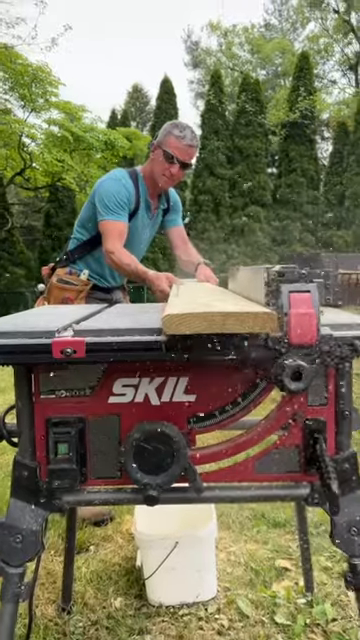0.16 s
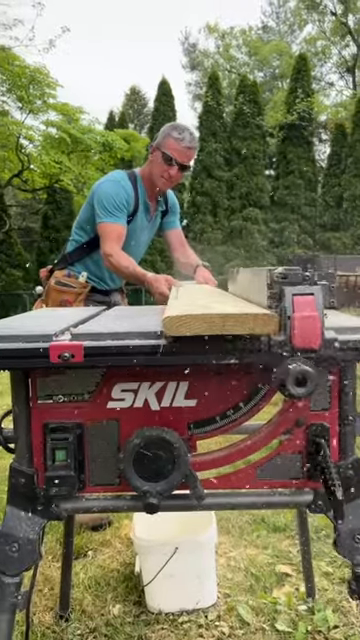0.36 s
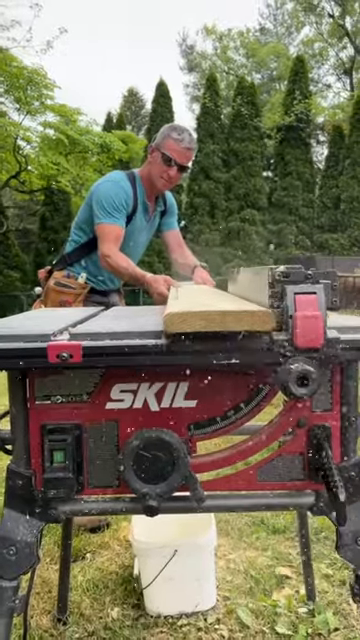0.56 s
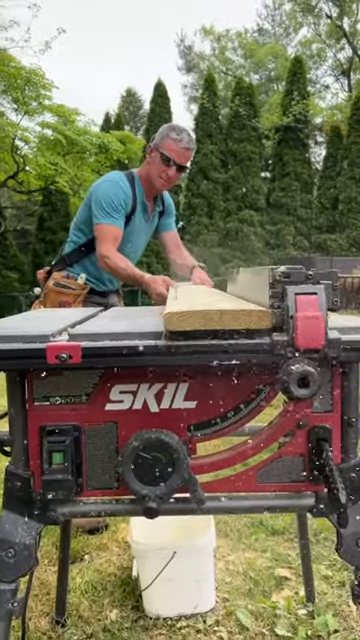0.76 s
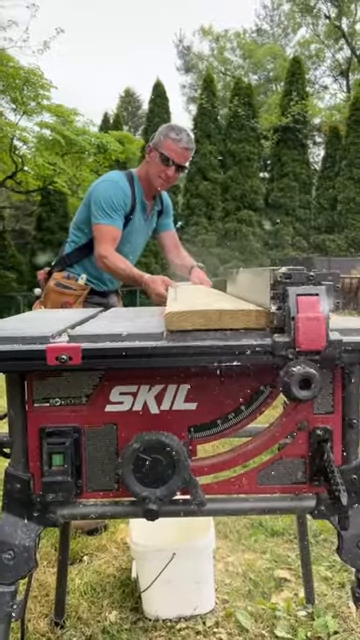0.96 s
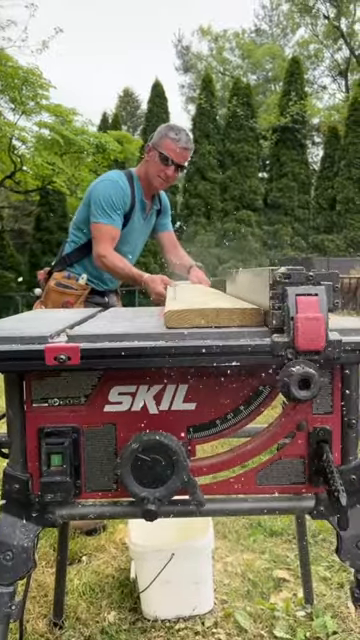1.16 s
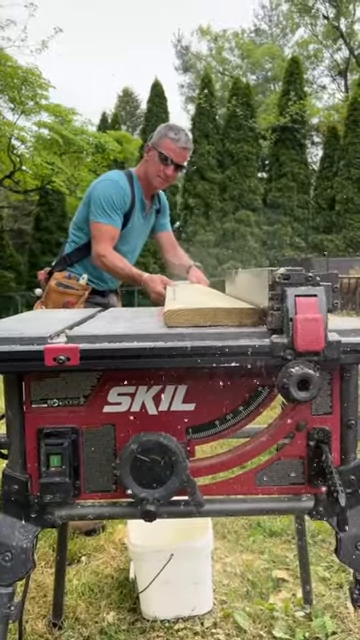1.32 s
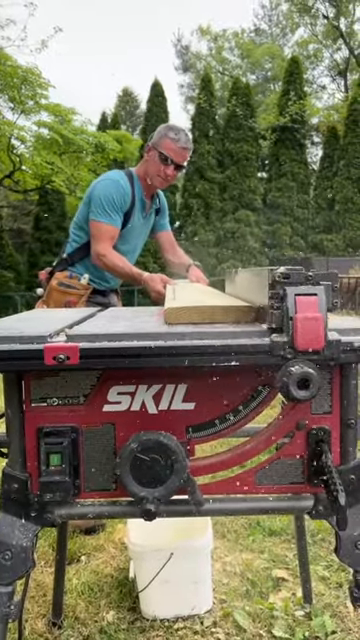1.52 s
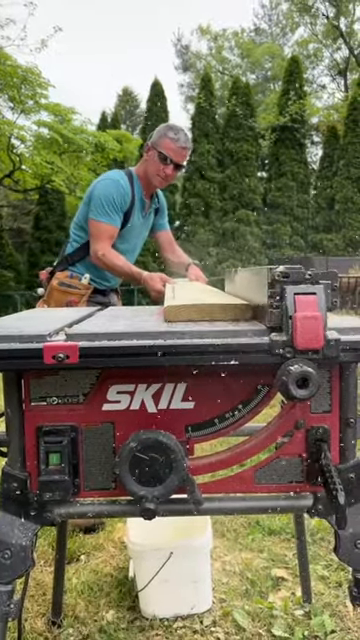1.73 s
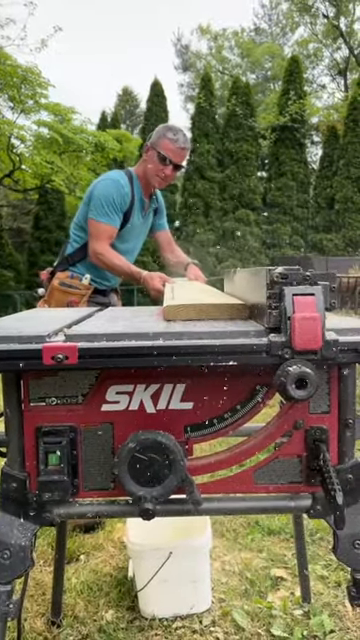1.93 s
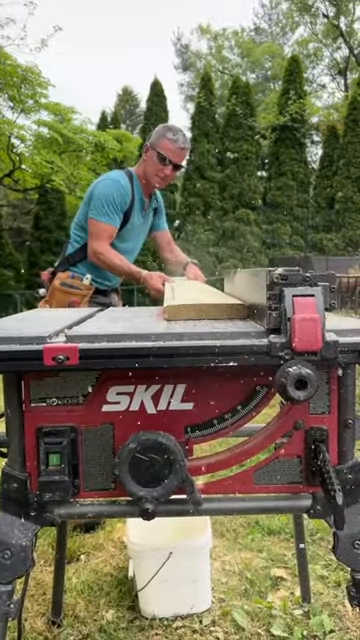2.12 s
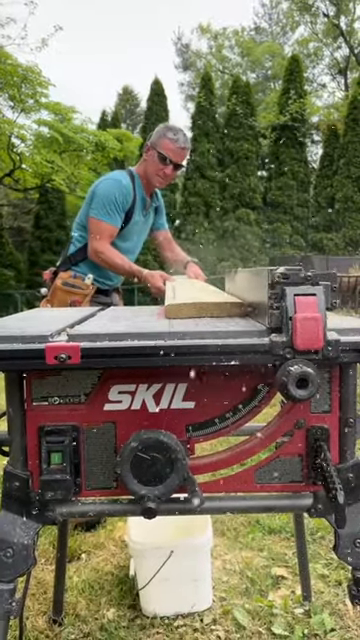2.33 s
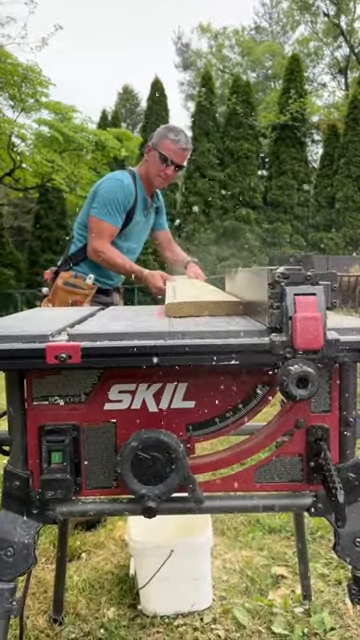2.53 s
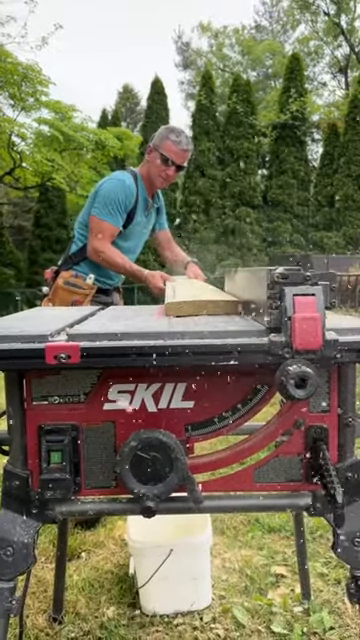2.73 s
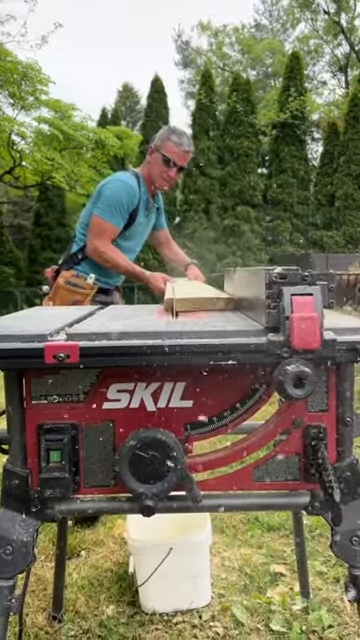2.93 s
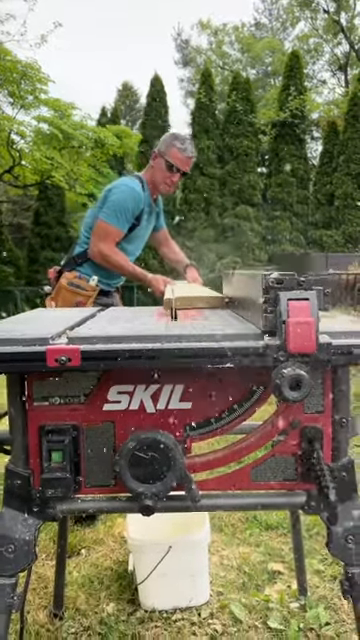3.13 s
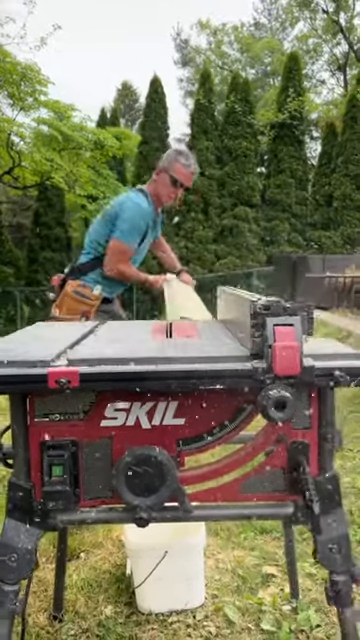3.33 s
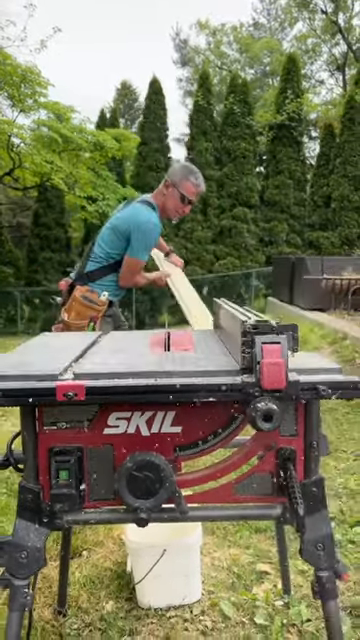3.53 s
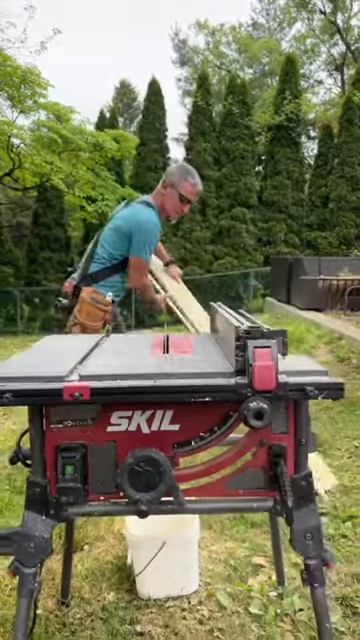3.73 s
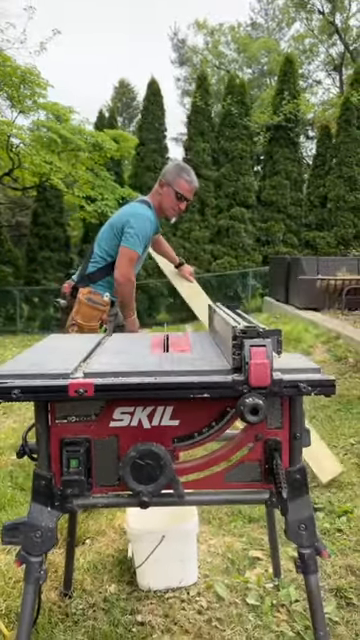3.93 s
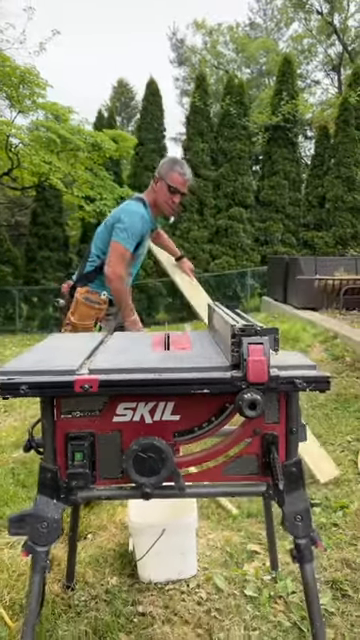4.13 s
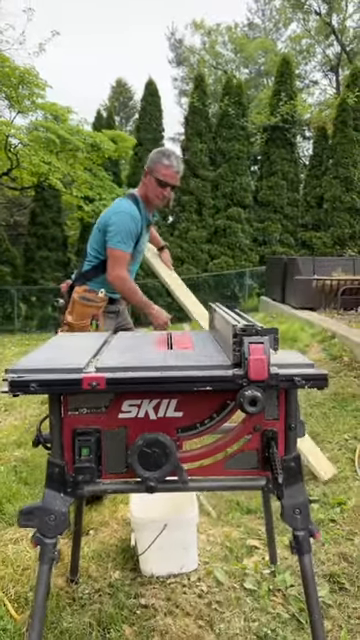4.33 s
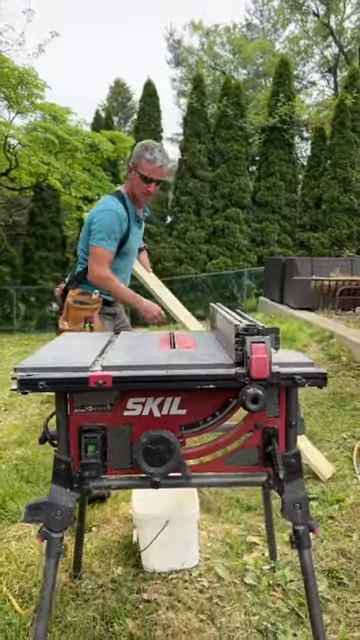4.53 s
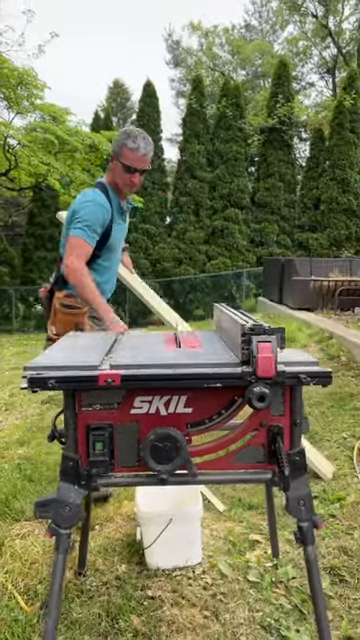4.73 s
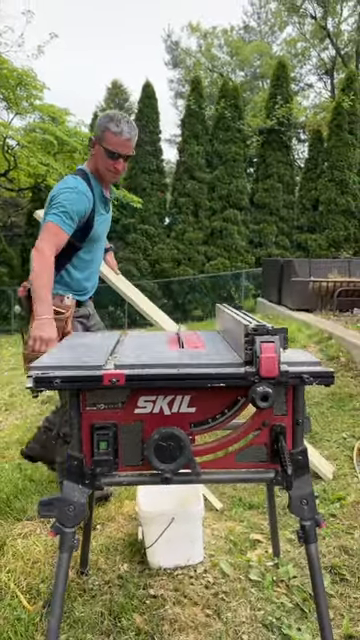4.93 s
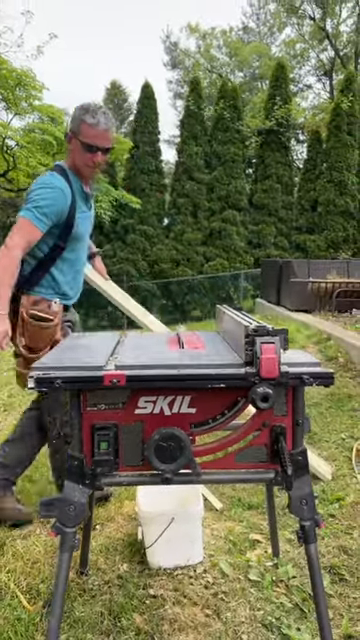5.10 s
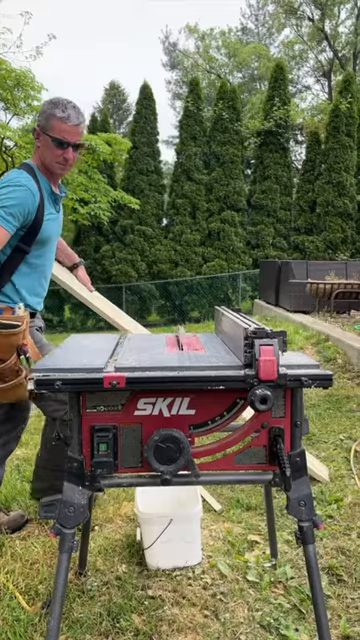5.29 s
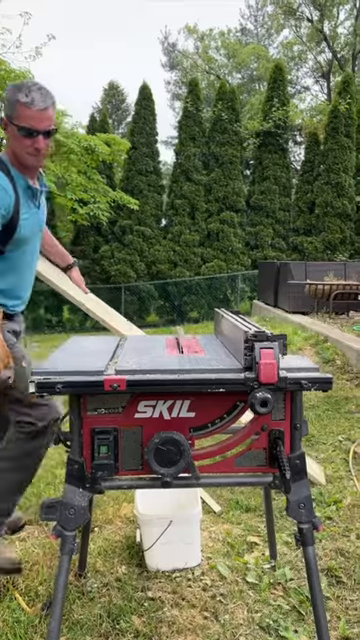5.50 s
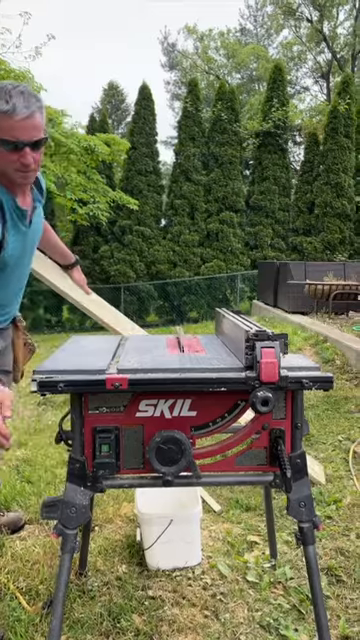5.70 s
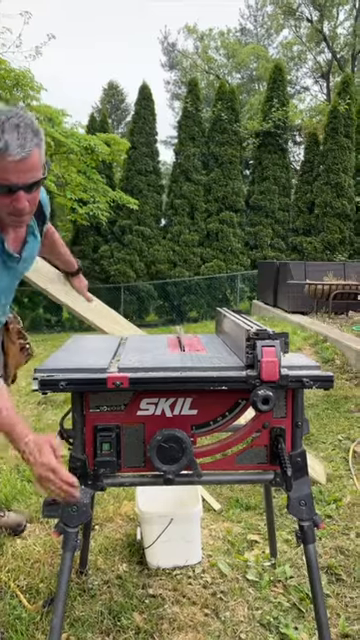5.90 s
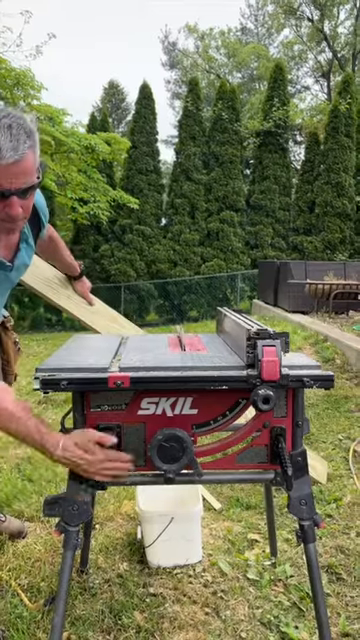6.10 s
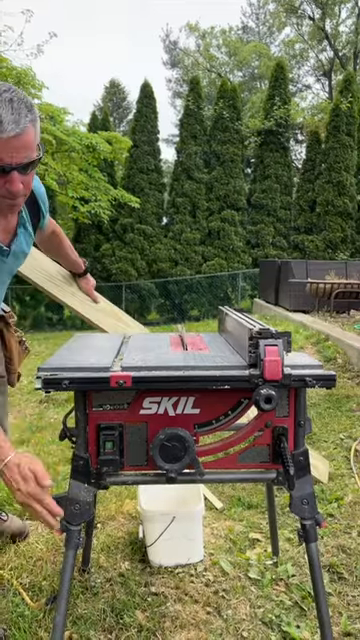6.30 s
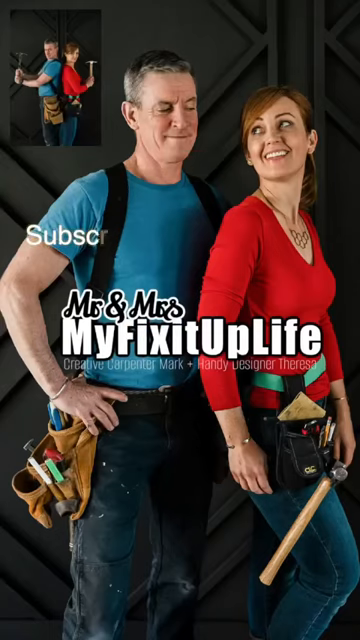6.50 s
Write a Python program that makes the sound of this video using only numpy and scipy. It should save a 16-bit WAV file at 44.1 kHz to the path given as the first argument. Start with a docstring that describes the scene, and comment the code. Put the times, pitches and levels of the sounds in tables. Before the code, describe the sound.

Outdoors and close, in wide stereo, a portable table saw is already ripping a plank at 0 s. Dense, bright, gritty chewing mixes with a hard tooth whine, ringing blade tones, woody rattle and the motor's low buzzing hum. The whine sags slightly until about 0.3 s, wavers, then climbs gradually from 1.5 s as the load eases, its overtones swelling in and out. A low tremor shakes the stand around 2.5 to 2.75 s. The chewing dips near 2.85 s, then one last harsh bite squeals at about 3.05 s and stops, leaving metal ringing briefly. From 3.1 s the freed blade spins up, settling into a smooth, airy roar with hiss and whirring motor tones. A faint, dull thud lands near 3.75 s. At about 6.05 s the saw is switched off; pitch and hiss fall quickly, and everything cuts off abruptly near 6.35 s.

```python
"""On a lawn, a portable table saw rips a plank. The teeth whine as tones locked to the blade speed; torn
fibres are dense noisy clicks that chew, ring the blade modes and rattle the plank. The loaded motor hums at
fixed pitches, roars and hisses as shaped noise, and its armature tones follow the speed. The blade bites once
more, spins up freely, is switched off, and the sound is cut short. The sound is wide in stereo, its width and
side changing with pitch."""
import sys
import numpy as np
from scipy import signal
from scipy.io import wavfile
from scipy.ndimage import uniform_filter1d

SR = 44100
rng = np.random.default_rng(int(sys.argv[2]) if len(sys.argv) > 2 else 0)


def int16_out(signal):
    """Quantize to a 16-bit WAV file."""
    q = np.round(np.clip(np.atleast_2d(signal).T, -1, 1) * 32767)
    wavfile.write(sys.argv[1], SR, q.astype(np.int16))


N = 288855

# Blade speed under load. Each row: time in seconds, blade turns per second.
LOADED_SPEED = [(0.0, 57.6), (0.15, 57.35), (0.33, 56.83), (0.5, 57.12), (0.8, 58.35), (1.03, 58.63),
                (1.2, 58.37), (1.42, 57.66), (1.6, 58.05), (1.8, 58.87), (1.97, 59.85), (2.28, 60.6),
                (2.4, 61.2), (2.55, 61.9), (2.7, 62.98), (2.85, 63.5), (3.0, 62.0), (3.12, 58.5)]
FREE_TURNS_PER_S, SPIN_UP_S = 71.0, .63   # freed, the blade closes in on its idle speed
OFF_S, RUN_DOWN_PER_S2 = 6.035, 68        # switched off, it loses this many turns per second each second
TOOTH_COUNT, GEAR = 24, 5.385             # GEAR is motor turns per blade turn

# Tooth whine as multiples of the tooth rate; alternating left and right ground teeth add half lines.
# Each entry: multiple.
WHINE_MULTIPLES = [1, 2, 3, 4, 5, 4.5, 5.5]
# Bed of each whine line between swells. Each entry: middle level in dB.
WHINE_BED_DB = [-48.5, -50, -54, -44.5, -47.5, -50, -54]
# Swells of the whine. Each row: start in seconds, end in seconds, tooth multiple, level in dB.
WHINE_SWELLS = [(0.1, 0.42, 1, -38), (0.48, 0.68, 1, -41), (1.75, 2.0, 1, -47), (2.04, 2.58, 1, -40.5),
                (0.36, 0.5, 2, -43), (0.7, 0.9, 2, -42), (1.22, 1.4, 2, -39), (1.5, 1.72, 2, -40.5),
                (1.92, 2.33, 2, -37), (1.66, 1.86, 3, -42), (1.9, 2.06, 3, -35), (0.0, 0.1, 4, -36),
                (0.18, 0.33, 4, -32), (0.44, 0.6, 4, -40), (0.68, 0.95, 4, -32.5), (1.0, 1.4, 4, -28),
                (1.46, 1.68, 4, -35.5), (2.04, 2.2, 4, -35), (2.66, 2.78, 4, -41), (2.04, 2.19, 5, -38),
                (0.68, 1.42, 4.5, -40), (1.86, 1.98, 4.5, -40), (1.55, 1.75, 5.5, -46),
                (2.0, 2.3, 5.5, -42)]
WHINE_END_S, SWELL_EDGE_DB_PER_S = 2.85, 223.5
# Thin tone under the fourth tooth multiple at the start. Each row: time in seconds, level in dB.
STRAY = [(0, -38), (.28, -43), (.4, -62)]
STRAY_PER_TURN = 90   # cycles per blade turn

# Strength of the cut, before trims. Each row: time in seconds, chewing in dB, plank rattle in dB.
CUT = [(0.0, -32, -36.5), (0.35, -32.5, -37), (0.6, -33.5, -38.5), (1.45, -33.5, -38), (1.9, -35, -35.5),
       (2.14, -35, -35.5), (2.3, -34, -40), (2.45, -34.5, -37), (2.78, -31.5, -41.5), (2.84, -39, -47),
       (2.96, -37.5, -49), (3.04, -28.5, -40.5), (3.09, -32.5, -58), (3.13, -45.5, -66.5), (3.2, -54, -63)]
# Colour of the chewing. Each row: frequency in Hz, relative level in dB per Hz.
CHEW_COLOUR = [(35, -45.5), (60, -14.5), (150, -17), (190, -6), (240, -9), (300, -10), (600, -4.5),
               (850, -1), (1100, -3), (1300, -9), (2150, -13), (2500, -10), (3300, -8), (4100, -11),
               (5000, -2.5), (6000, -1), (7000, -4.5), (8500, -6.5), (10000, -8), (10600, -9), (11150, -13),
               (12000, -14), (16000, -17)]
# Blade modes rung by the cut. Each entry: pitch in Hz.
BLADE_HZ = [1700, 1990, 2245, 3170, 3790, 4600, 4780, 5050, 5255, 5450, 5810, 6030, 6150, 6326, 6630, 7040,
            7235, 7535, 7850, 8075, 8700, 9300, 9580, 9780, 10228, 10370, 10930, 11295]
# Weight of each of those modes before it follows the chewing. Each entry: level in dB.
BLADE_DB = [-51.5, -51, -44.5, -54, -55.5, -47, -51, -49, -43, -44, -46, -43, -44, -49, -50, -49, -50, -51,
            -54, -50, -52, -48.5, -50, -52, -49, -50, -52, -50]
# Plank resonances. Each row: pitch in Hz, width of one filter pass in Hz, relative level in dB.
PLANK = [(382.5, 96, 0.5), (403.2, 58, 3), (435, 55, -1.5), (469.7, 50, -6), (816, 170, 0.5),
         (930, 240, -0.5)]
# The plank rubs the blade side. Each row: time in seconds, pitch in Hz, level in dB.
SQUEAL = [(2.9, 5150, -50.5), (3.02, 5270, -32), (3.045, 5100, -29), (3.085, 5300, -31), (3.12, 5330, -73)]

# The clearest blade modes. Each row: pitch in Hz before the rise, blur in Hz, roughness as a ratio.
SINGING_MODES = [(2632, 45, 1.5), (3381, 28, .6), (10228, 30, .8), (6150, 35, .8)]
# Bed of each clear mode between swells. Each entry: middle level in dB.
SINGING_BED_DB = [-43.5, -42, -56, -52]
# Swells of the clear modes. Each row: start in seconds, end in seconds, mode number 1 to 4, level in dB.
SINGING_SWELLS = [(0.034, 0.455, 1, -36.5), (0.6, 0.85, 1, -38.5), (1.2, 1.4, 1, -36.5),
                  (1.5, 1.783, 1, -38), (2.15, 2.326, 1, -39), (2.5, 2.747, 1, -40.5),
                  (0.473, 0.564, 2, -34), (0.6, 1.3, 2, -40.5), (1.38, 1.837, 2, -34.5),
                  (2.1, 2.27, 2, -39.5), (2.38, 2.434, 2, -38.5), (2.6, 2.76, 2, -41),
                  (3.044, 3.123, 2, -39), (0.28, 0.4, 3, -44), (2.2, 2.55, 3, -43), (0.08, 0.6, 4, -37)]
SINGING_END_S = 3.15
FREED_S, FREED_RISE = 2.8, .011   # with the plank no longer pressing, the clear modes rise by this ratio
# More modes sing on after the last bite. Each row: pitch in Hz, relative level in dB.
RING_OUT_MODES = [(2350, -39), (3060, -43), (3740, -45), (4230, -48), (4400, -51), (4690, -48), (4880, -51)]
# Their shared decay. Each row: time in seconds, gain in dB.
RING_OUT = [(3.02, -30), (3.07, -1), (3.14, -5), (3.4, -17), (3.6, -32)]

# Motor fan and brushes, before trims. Each row: time in seconds, roar in dB, hiss in dB, gain of the
# armature and casing tones in dB.
MOTOR = [(0, -36, -47, -8), (2.8, -36, -52, -6), (3.25, -32.5, -50.5, -6), (3.44, -33, -48.5, -5.5),
         (3.8, -34, -47.5, -2), (4.18, -34.5, -47, 2), (4.6, -34, -46.5, 1), (4.91, -34, -44, 2.5),
         (6.09, -33, -43, 2), (6.17, -36, -48.5, -6), (6.33, -41.5, -53.5, -3)]
# Colour of the fan roar. Each row: frequency in Hz, relative level in dB per Hz.
ROAR_COLOUR = [(40, -38), (100, -21), (160, -19), (270, -14.5), (310, -12), (380, -4.5), (620, -7),
               (780, 0.5), (950, -2), (1280, -5.5), (1500, -1), (2000, -4), (2400, -2), (2800, -4),
               (4000, -12), (4500, -14), (6000, -24), (16000, -34.5)]
# Colour of the brush hiss. Each row: frequency in Hz, relative level in dB per Hz.
HISS_COLOUR = [(1500, -27.5), (4000, 1.5), (6000, -2), (9000, -6), (13500, -8.5), (14500, -20.5),
               (16000, -9.5)]
# Armature tones. Each row: multiple of motor turns, relative level in dB.
ARMATURE = [(.5, -61), (1, -58), (2, -44), (3, -43), (4, -44), (5, -48), (5.5, -49), (7, -48), (8, -49),
            (10, -54)]
# How freely the housing lets armature tones out as they climb. Each row: frequency in Hz, gain in dB.
VENTS = [(600, 0), (690, 6), (765, -1), (1040, -6), (1090, 0), (1150, 0), (1400, -6), (1455, 4), (1500, 3),
         (1525, -6), (1700, 0)]
COASTING_LOSS_DB = .8   # fade of armature and casing tones per turn a second lost after switch-off
# Air in the housing. Each row: pitch in Hz, width of one filter pass in Hz, relative level in dB.
CASING = [(514, 230, -48.5), (872, 195, -45), (1950, 330, -48.5)]
# Blade unbalance, before its speed gain. Each row: multiple of blade turns, level in dB.
WOBBLE = [(1, -55), (3, -60)]
# Load on the motor as a gain on its magnetic hum. Each row: time in seconds, gain in dB.
HUM_LOAD = [(0.0, -1.5), (0.4, 0), (1.9, -2), (2.3, -3.5), (2.44, -7), (2.5, -9), (2.92, -11), (3.28, -18),
            (3.36, -19), (3.9, -22), (4.5, -22), (6.03, -26.5), (6.06, -60)]
# Twice the mains rate and its multiples. Each row: pitch in Hz, roughness as a ratio.
HUM_LINES = [(119.8, .06), (239.6, .3), (359.5, .2)]
# Weight of each hum line before the load gain. Each entry: level in dB.
HUM_DB = [-43, -60, -33.5]
# The second hum line swells once. Each row: time in seconds, level in dB.
HUM_BUZZ = [(2.12, -66.5), (2.2, -51), (2.45, -52), (2.55, -65)]
# Brushes crossing the bars, before speed and fade. Each row: multiple of motor turns, level in dB.
COMMUTATOR = [(12, -52), (24, -48)]
COMMUTATOR_SLOPE_DB = [-.6, 1.8]   # per line, dB per blade turn a second above idle speed
COMMUTATOR_FADE_DB_PER_S = 90      # for both the fade-in and the fade after switch-off

# Low tremor of the stand. Each row: time in seconds, level in dB.
SHUDDER = [(2.42, -64.5), (2.48, -47), (2.74, -45.5), (2.79, -74)]
SHUDDER_HZ = 101.5
THUD_S, THUD_HZ, THUD_DB, THUD_T60_S = 3.745, 70, -41, .15   # the offcut lands on the grass

# Stereo image by pitch. Each row: frequency in Hz, phase of left ahead of right in half turns, random spread
# of that phase in radians before the flicker share, left minus right in dB.
STEREO_IMAGE = [(150, 0, .05, 0), (300, -.15, .15, -1.5), (500, -.25, .5, -1), (750, -.5, 1.0, -7),
                (920, -.5, 1.0, 0), (1140, -.25, 1.3, -9), (1450, -.1, 1.15, -2), (1900, 0, .85, -2),
                (2700, .57, 1.3, -2), (4000, .32, 1.2, -1.5), (4700, .5, 1.6, 0), (5300, .68, 1.0, 0),
                (5620, .82, .5, 0), (5800, 1, 0, 0), (6650, 1, 0, 0), (7200, 1.5, 1.2, 0), (7800, 2, 0, 0),
                (10000, 2, 0, 0), (10800, 2.45, 1.3, 0), (11600, 3, 0, 0), (13200, 3, 0, 0),
                (13800, 3.5, 1.3, 0), (14500, 4, 0, 0)]
# Side of the clean tones by pitch. Each row: frequency in Hz, left minus right in dB.
CLEAN_SIDES = [(1400, -9), (2350, 0), (2630, 3), (2720, -6), (3000, -7), (3380, -1), (4200, -2), (4600, -4),
               (5300, 0)]
# The abrupt end. Each row: time in seconds, gain in dB.
ENDING = [(6.343, 3.5), (6.35, -17), (6.385, -64), (6.4, -120)]
CUTOFF_HZ = 15720


def teeth(blade_hz):
    """Passing teeth whine at the tooth rate, its multiples and half lines, beside one stray tone."""
    levels_db = swells(WHINE_BED_DB, WHINE_MULTIPLES, WHINE_SWELLS, WHINE_END_S)
    whine = sum(from_db(db) * tone(k * TOOTH_COUNT * blade_hz, blur_hz=24, rough=.33)
                for k, db in zip(WHINE_MULTIPLES, levels_db))
    stray_db, = in_time(STRAY, after=-200)
    return whine + from_db(stray_db) * tone(STRAY_PER_TURN * blade_hz, blur_hz=15, rough=.4)


def cut(blade_hz, chew_db, rattle_db):
    """Torn fibres are dense uneven clicks that colour the air, ring the blade and rattle the plank."""
    uneven_db = 2.4 * rng.standard_normal(N) + 0.26 * drift(68)
    fibres = rms_one(rng.standard_normal(N) * from_db(uneven_db))
    turns = np.cumsum(blade_hz) / SR
    # each tooth tears in a burst
    fibres = fibres * (1 + 0.2 * np.sin(2 * np.pi * TOOTH_COUNT * turns))
    chew = from_db(chew_db + 6) * coloured(fibres, CHEW_COLOUR, patchy_db=2.5)

    ringing = sum(from_db(db + 3.0 * drift(3.5)) * resonance(fibres, hz, width_hz=45 + hz / 150)
                  for hz, db in zip(BLADE_HZ, BLADE_DB))
    ringing = ringing * from_db(chew_db - np.max(chew_db) - 0.5)

    squeal_hz, squeal_db = in_time(SQUEAL)
    squeal = from_db(squeal_db) * tone(squeal_hz, blur_hz=500, rough=4.0)

    plank = rms_one(sum(from_db(db) * resonance(fibres, hz, width_hz) for hz, width_hz, db in PLANK))
    rattle = from_db(rattle_db + 3.5 + 0.58 * drift(40)) * plank
    return chew + ringing + squeal + rattle


def singing():
    """The clearest blade modes swell and sink as blurred tones; others sing on after the last bite."""
    rise = 1 + FREED_RISE * np.clip((np.arange(N) / SR - FREED_S) / .15, 0, 1)
    mode_numbers = range(1, len(SINGING_MODES) + 1)
    levels_db = swells(SINGING_BED_DB, mode_numbers, SINGING_SWELLS, SINGING_END_S)
    held = sum(from_db(db) * tone(hz * rise, blur_hz, rough)
               for (hz, blur_hz, rough), db in zip(SINGING_MODES, levels_db))
    after = sum(from_db(db) * tone(hz, blur_hz=20, rough=.7) for hz, db in RING_OUT_MODES)
    return held + from_db(in_time(RING_OUT)[0]) * after


def motor(blade_hz, powered_hz):
    """Fan roar, brush hiss, armature and casing tones, unbalance at high speed and hum under load."""
    roar_db, hiss_db, tones_db = in_time(MOTOR)
    turns_hz = GEAR * blade_hz
    air = rng.standard_normal(N)
    roar = from_db(roar_db + 2) * coloured(air, ROAR_COLOUR, patchy_db=0.1)
    hiss = from_db(hiss_db + 7.0) * coloured(rng.standard_normal(N), HISS_COLOUR, patchy_db=2.5)

    armature = sum(from_db(db + at_hz(VENTS, k * turns_hz)[0]) * tone(k * turns_hz, blur_hz=14 * k, rough=.9)
                   for k, db in ARMATURE)
    casing = sum(from_db(db) * resonance(air, hz, width_hz) for hz, width_hz, db in CASING)
    coasting_db = COASTING_LOSS_DB * (powered_hz - blade_hz)
    tones = from_db(tones_db - coasting_db) * (armature + casing)

    # the stand resonates as the blade nears full speed
    near_top_db = 2.2 * (powered_hz - FREE_TURNS_PER_S) + 0.51 * (blade_hz - powered_hz) - 1.5
    wobble = sum(from_db(db + near_top_db) * tone(k * blade_hz, blur_hz=3.4, rough=0.15)
                 for k, db in WOBBLE)

    load_db, = in_time(HUM_LOAD, after=-200)
    hum = sum(from_db(db + load_db) * tone(hz, blur_hz=5.3, rough=rough)
              for (hz, rough), db in zip(HUM_LINES, HUM_DB))
    buzz_db, = in_time(HUM_BUZZ, after=-200)
    buzz = from_db(buzz_db) * tone(HUM_LINES[1][0], blur_hz=6.0, rough=0.17)
    return roar + hiss + tones + wobble + hum + buzz


def commutator(blade_hz, powered_hz):
    """Brushes crossing the bars make thin lines at multiples of motor turns, clear once the blade is free."""
    t = np.arange(N) / SR
    free_s = LOADED_SPEED[-1][0]
    until_clear_s = np.clip(free_s + .2 - t, 0, .2)
    fade_db = COMMUTATOR_FADE_DB_PER_S * (np.maximum(t - OFF_S, 0) + until_clear_s)
    above_idle = powered_hz - FREE_TURNS_PER_S
    return sum(from_db(db + slope_db * above_idle + 2.2 * drift(3) - fade_db)
               * tone(k * GEAR * blade_hz, blur_hz=12, rough=.3)
               for (k, db), slope_db in zip(COMMUTATOR, COMMUTATOR_SLOPE_DB))


def stand():
    """A short low tremor near the end of the cut, and the offcut's thud as a dying sine."""
    since_s = np.maximum(np.arange(N) / SR - THUD_S, 0)
    thud = from_db(THUD_DB - 60 * since_s / THUD_T60_S) * np.sin(2 * np.pi * THUD_HZ * since_s)
    return from_db(in_time(SHUDDER)[0]) * tone(SHUDDER_HZ, blur_hz=8, rough=0.2) + thud


def stereo(x, flicker_share, sides=None):
    """Spreads x: each pitch gets a left-right phase and level difference, with random flicker."""
    hz, _, z = signal.stft(x, SR, nperseg=1024)
    half_turns, spread, lean_db = (c[:, None] for c in at_hz(STEREO_IMAGE, hz))
    if sides:
        lean_db = at_hz(sides, hz)[0][:, None]
    flicker = rms_one(uniform_filter1d(rng.standard_normal(z.shape), size=2, axis=0))
    phase = np.pi * half_turns + flicker_share * spread * flicker
    # left and right each take half of the phase and level difference
    pair = [z * np.exp(.5j * s * phase) * from_db(.5 * s * lean_db) for s in (1, -1)]
    return signal.istft(np.array(pair), SR, nperseg=1024)[1][:, :N]


def speed():
    """Blade turns a second under power (loaded curve, then spin-up), and the turns lost once off."""
    t = np.arange(N) / SR
    free_s, free_from = LOADED_SPEED[-1]
    spin_up = (FREE_TURNS_PER_S - free_from) * (1 - np.exp(-np.maximum(t - free_s, 0) / SPIN_UP_S))
    return in_time(LOADED_SPEED)[0] + spin_up, RUN_DOWN_PER_S2 * np.maximum(t - OFF_S, 0)


def swells(bed_db, names, rows, end_s):
    """Level of each tone in dB: a wavering bed, lifted by its swells, faded from end_s on."""
    t = np.arange(N) / SR
    levels = [db + 2.2 * drift(4) for db in bed_db]
    for start_s, stop_s, which, db in rows:
        k = np.argmin(np.abs(np.subtract(names, which)))
        outside_s = np.maximum(np.maximum(start_s - t, t - stop_s), 0)
        levels[k] = np.maximum(levels[k], db - SWELL_EDGE_DB_PER_S * outside_s)
    return [db - SWELL_EDGE_DB_PER_S * np.maximum(t - end_s, 0) for db in levels]


def tone(hz, blur_hz, rough):
    """A sine of rms 1 on its exact pitch, with a share of narrow noise around it."""
    phase = 2 * np.pi * (np.cumsum(hz + np.zeros(N)) / SR + rng.random())
    in_step = (1 + rough * drift(blur_hz)) * np.sin(phase)
    return rms_one(in_step + rough * drift(blur_hz) * np.cos(phase))


def resonance(x, hz, width_hz):
    """A two-pole resonance applied twice; rms 1."""
    r = np.exp(-np.pi * width_hz / SR)
    b, a = [1, 0, -1], [1, -2 * r * np.cos(2 * np.pi * hz / SR), r * r]
    once = signal.lfilter(b, a, x)
    return rms_one(signal.lfilter(b, a, once))


def coloured(x, spectrum, patchy_db):
    """Gives x a spectrum whose narrow regions swell and sink on their own; rms 1."""
    hz, _, z = signal.stft(x, SR, nperseg=1024)
    z = z * from_db(at_hz(spectrum, hz)[0][:, None] + patchy_db * patches(z.shape))
    return rms_one(signal.istft(z, SR, nperseg=1024)[1][:N])


def patches(shape):
    """A random field over frequency and time, smooth across a few cells; spread 1."""
    across_hz = uniform_filter1d(rng.standard_normal(shape), size=3, axis=0)
    return rms_one(uniform_filter1d(across_hz, size=4, axis=1))


def drift(rate):
    """Slow random wander of spread 1, drawn every 40 samples and joined by straight lines."""
    r = np.exp(-80 * np.pi * rate / SR)
    noise = rng.standard_normal(N // 40 + 2002)
    slow = signal.lfilter([1], [1, -2 * r, r * r], noise)[2000:]   # skips the filter's settling
    return np.interp(np.arange(N) / 40, np.arange(len(slow)), rms_one(slow))


def in_time(rows, after=None):
    """Columns of a time table, one value per sample."""
    s, *columns = np.transpose(rows)
    return [np.interp(np.arange(N) / SR, s, c, right=after) for c in columns]


def at_hz(points, hz):
    """Columns of a spectrum table on a log-frequency axis."""
    f, *columns = np.transpose(points)
    return [np.interp(np.log(hz + 1), np.log(f), c) for c in columns]


def from_db(db):
    """Decibels to gain."""
    return 10 ** (np.asarray(db) / 20)


def rms_one(x):
    """Scale to rms 1."""
    return x / np.sqrt(np.mean(x ** 2) + 1e-20)


def scene():
    """Mixes saw, plank and stand into stereo; the clean tones flicker less than the rest."""
    powered_hz, lost_hz = speed()
    blade_hz = powered_hz - lost_hz
    chew_db, rattle_db = in_time(CUT, after=-200)
    clean = teeth(blade_hz) + singing() + commutator(blade_hz, powered_hz)
    rest = cut(blade_hz, chew_db, rattle_db) + motor(blade_hz, powered_hz) + stand()
    return stereo(clean, flicker_share=0.23, sides=CLEAN_SIDES) + stereo(rest, flicker_share=0.97)


def record(dry):
    """The sound is faded out abruptly and a steep low-pass cuts the top."""
    steep = signal.ellip(12, .5, 70, CUTOFF_HZ, fs=SR, output="sos")
    return signal.sosfilt(steep, dry * from_db(in_time(ENDING)[0]))


dry = scene()
out = record(dry)
int16_out(out)
```